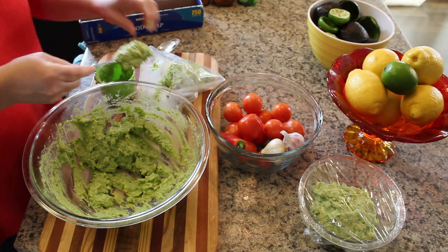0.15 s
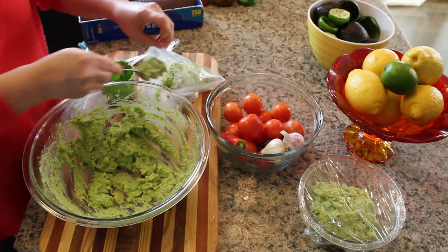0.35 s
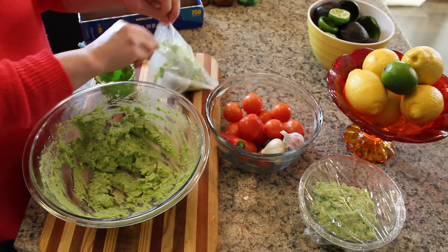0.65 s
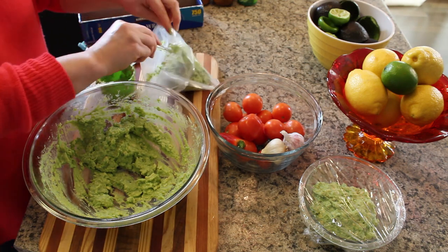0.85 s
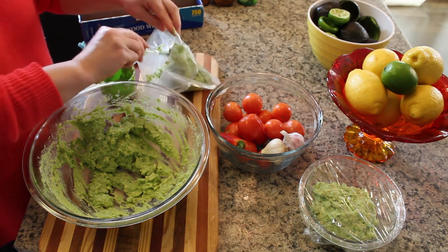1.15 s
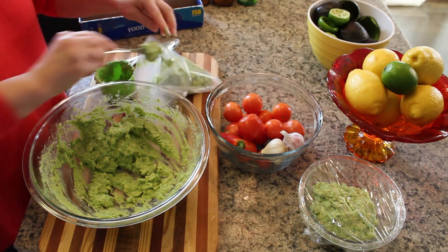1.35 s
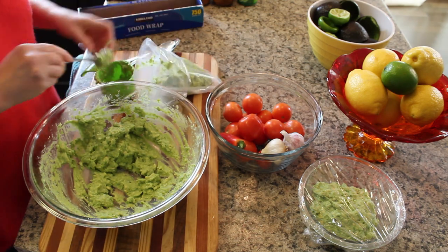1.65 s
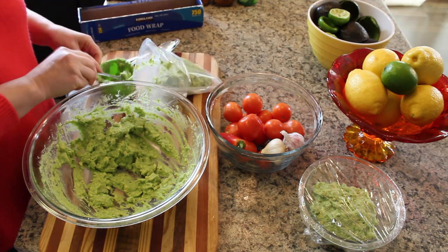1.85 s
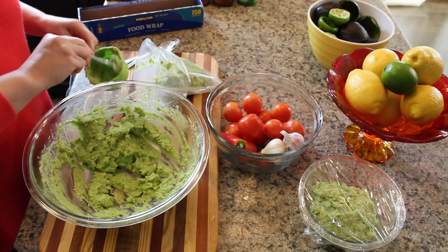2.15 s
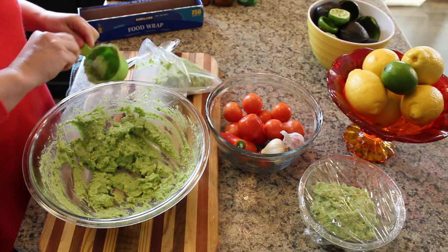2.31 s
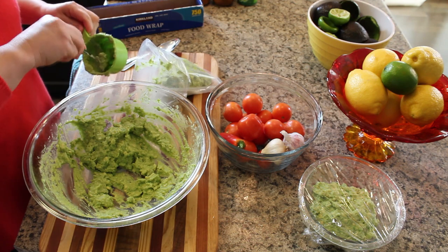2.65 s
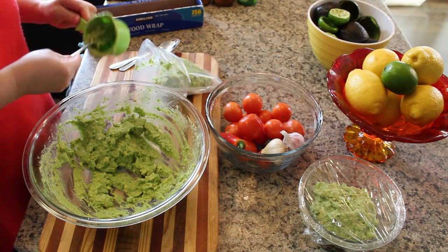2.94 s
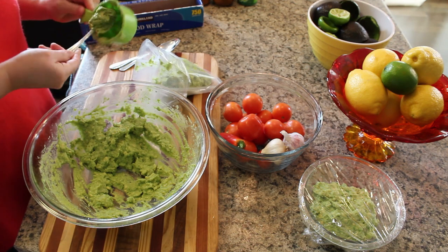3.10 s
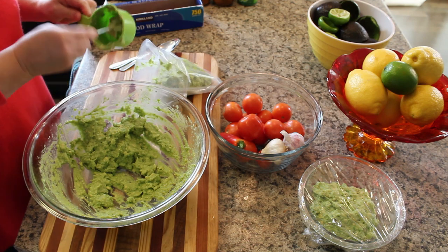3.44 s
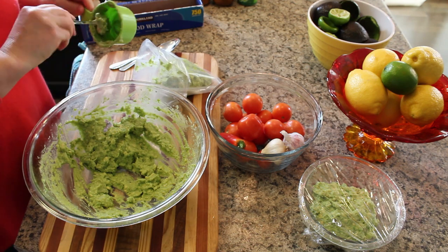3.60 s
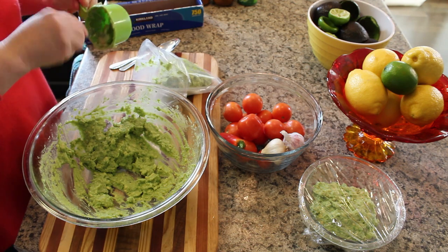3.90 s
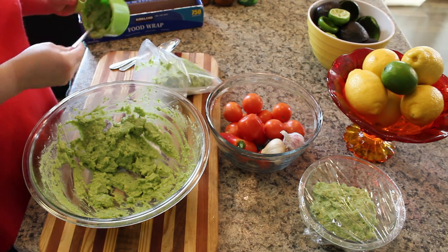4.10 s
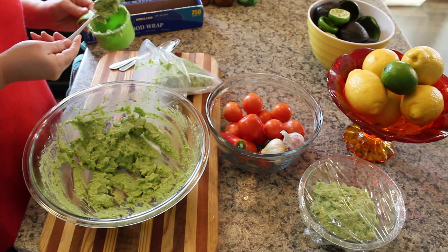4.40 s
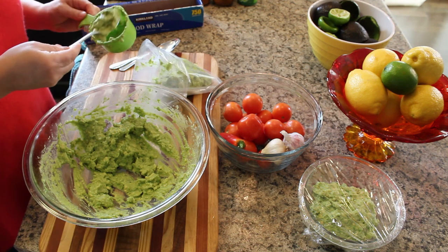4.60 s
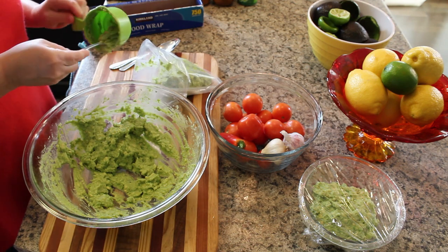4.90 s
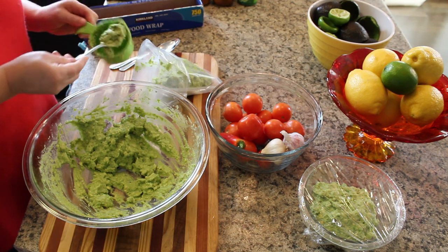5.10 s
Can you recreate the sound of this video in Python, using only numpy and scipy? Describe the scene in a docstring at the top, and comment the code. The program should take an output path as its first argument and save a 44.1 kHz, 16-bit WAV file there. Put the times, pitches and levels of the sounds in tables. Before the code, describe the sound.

A thin plastic bag crackles and snaps, then a metal spoon knocks and scrapes inside a small plastic cup in a kitchen.

```python
"""First a thin plastic bag crackles as it is filled: random creases and snaps excite damped resonances.
Then a metal spoon knocks and scrapes inside a small plastic cup held over a kitchen counter.
Knocks sum a puff of air, wall modes, a tick and a thud; scrapes send random slips through resonators.
An appliance hums faintly in steady filtered noise, and the hard kitchen rings briefly."""
import sys
import numpy as np
from scipy import signal
from scipy.io import wavfile

SR = 44100
rng = np.random.default_rng(int(sys.argv[2]) if len(sys.argv) > 2 else 0)


def to_wav(s):
    """Save 16-bit WAV."""
    ch = np.atleast_2d(s).T  # columns
    pcm = np.round(np.clip(ch, -1, 1) * 32767)  # PCM
    wavfile.write(sys.argv[1], SR, pcm.astype(np.int16))


N = 231722


def gain_of(db):
    """Level law: 20 dB is a factor of ten in amplitude."""
    return 10 ** (np.asarray(db) / 20)


def evened(x):
    """Normalization to unit rms."""
    return x / np.sqrt(np.mean(x ** 2) + 1e-20)


def peaked(x):
    """Normalization to unit peak."""
    return x / (abs(x).max() + 1e-20)


def read(points, hz):
    """Interpolation of a spectral curve along logarithmic frequency."""
    f, value = np.transpose(points)
    return np.interp(np.log(hz + 1), np.log(f + 1), value)


def add(mix, start_s, sound):
    """Superposition of a sound on the mix, cut at its end."""
    part = mix[round(start_s * SR):][:len(sound)]
    part += sound[:len(part)]


def resonate(x, hz, width):
    """Damped resonance of peak gain 1; a moving one is heterodyned to zero, smoothed and shifted back."""
    r = np.exp(-np.pi * abs(width) / SR)
    if np.ndim(hz) == 0:
        return 2 * signal.lfilter([1 - r], [1, -r * np.exp(2j * np.pi * hz / SR)], x).real
    turn = np.exp(2j * np.pi * np.cumsum(hz) / SR)
    smoothed = signal.lfilter([1 - r], [1, -r], x / turn)
    return 2 * (turn * smoothed).real


def resonate_twice(x, hz, first_width, second_width):
    """Cascaded resonances: two in series have steeper skirts than one."""
    return resonate(resonate(x, hz, first_width), hz, second_width)


def colour(x, points):
    """Minimum-phase filtering: a causal response with the given dB spectrum."""
    log_gain = np.log(gain_of(read(points, abs(np.fft.fftfreq(4096, 1 / SR)))))
    spectrum = np.exp(np.conj(signal.hilbert(log_gain)))
    taps = np.fft.ifft(spectrum).real[:2048]
    return signal.oaconvolve(x, taps)[:len(x)]


def tilted(x, treble_db):
    """Band splitting: the part above 6 kHz is lifted or lowered."""
    low_sos = signal.butter(3, 6000, "low", fs=SR, output="sos")
    high_sos = signal.butter(3, 6000, "high", fs=SR, output="sos")
    return signal.sosfilt(low_sos, x) + gain_of(treble_db) * signal.sosfilt(high_sos, x)


def grit(length, per_s, spread_db):
    """Stick-slip as random impulses: slips of random sign, a few of them large."""
    size = gain_of(spread_db * np.minimum(rng.exponential(1, length), 5))
    sign = rng.choice([-1., 1.], length)
    return evened(size * sign * (rng.random(length) < per_s / SR))


def wander(length, per_s):
    """Slow random modulation: normal values, per_s of them a second, joined by straight lines."""
    s = np.arange(int(length / SR * per_s) + 2) / per_s
    return np.interp(np.arange(length) / SR, s, rng.standard_normal(len(s)))


def decay(t60, t):
    """Exponential decay: 60 dB in t60 seconds."""
    return gain_of(-60 * t / t60)


def ring(hz, t60, t):
    """Free vibration of one mode: a decaying sine."""
    return np.sin(2 * np.pi * hz * t) * decay(t60, t)


# spectrum shape of the steady room noise: (frequency [Hz], density [dB per Hz])
ROOM_SPECTRUM = [(20, -23.5), (85, -18), (140, -11.5), (350, -14), (640, -16), (4400, -26), (9400, -35),
                 (13000, -43), (16000, -48)]
# motor lines: (frequency [Hz], rms level [dB], width [Hz], share of wavering [0-1])
MOTOR_LINES = [(111.3, -63, 10.6, 0.23), (181.3, -63.5, 22, 0.97), (260, -55, 14, 0.42), (486, -62, 24, 1)]
ROOM_NOISE_DB = -53.5  # rms


def room_tone():
    """Stationary noise and narrow-band hum: hiss and rumble with the wavering lines of a motor."""
    out = gain_of(ROOM_NOISE_DB) * evened(colour(rng.standard_normal(N), ROOM_SPECTRUM))
    t = np.arange(N) / SR
    for hz, db, width, share in MOTOR_LINES:
        waver = evened(resonate_twice(rng.standard_normal(N), hz, width, width))
        line = (1 - share) * np.sin(2 * np.pi * hz * t) + share * waver
        out = out + gain_of(db) * evened(line)
    return out


# reverberation of the kitchen: (frequency [Hz], t60 [s])
KITCHEN_T60 = [(200, 0.31), (1000, 0.37), (4000, 0.12), (12000, 0.53)]
# reflections from counter and cabinets: (delay [s], level [dB])
EARLY_ECHOES = [(.0035, -26.5), (.009, -13.5), (0.0139, -19), (0.022, -17.5)]


def kitchen(x):
    """Room impulse response: early echoes, then sparse taps, each band dying at its own speed."""
    taps = np.zeros(SR // 2)
    at = np.arange(300, len(taps) - 20, 20)
    taps[at + rng.integers(0, 20, len(at))] = rng.choice([-1., 1.], len(at))
    hz, t, bands = signal.stft(taps, SR, nperseg=256)
    decaying = bands * decay(read(KITCHEN_T60, hz)[:, None], t)
    tail = signal.istft(decaying, SR, nperseg=256)[1]
    tail = gain_of(-20.5) * tail / np.linalg.norm(tail)
    for delay_s, db in EARLY_ECHOES:
        tail[round(delay_s * SR)] += gain_of(db)
    return signal.fftconvolve(x, tail)[:N]


# radiation of small objects, little bass and a dull top: (frequency [Hz], gain [dB])
RADIATION = [(40, -47), (120, -12.5), (220, -3), (500, 1), (10500, -1.5), (13000, -5.5), (16000, -16)]


def radiated(x):
    """Radiation efficiency: objects small beside the wavelength send out little bass."""
    return colour(x, RADIATION)


# bag handling: (time [s], rustle level [dB], brightness, also fizz re rustle [dB])
BAG_HANDLING = [(0.25, -68, 0), (0.33, -51, -2), (0.45, -52, -4), (0.582, -41.5, -4), (0.65, -39.5, -13),
                (0.7, -45, -13), (0.77, -36.5, -11), (0.85, -42, -7), (0.926, -50.5, -9), (0.978, -42, -15),
                (1.02, -45, -14), (1.09, -57.5, -10), (1.17, -42, -2.5), (1.248, -50, -10),
                (1.29, -40, -11.5), (1.416, -48, -6), (1.472, -60.5, -10), (1.55, -70, 5)]
# bright edge of film fizz and of clicks: (frequency [Hz], gain [dB])
BRIGHT_EDGE = [(2500, -19), (5000, 9), (9500, 5), (12500, -3), (16500, -23.5)]
POP_HZ, POP_OCTAVES_PER_DB = 2600, 0.05  # brighter handling pops higher
FLAP_DB, FLAP_FOLLOWS = -25.5, 0.54  # flaps follow the rustle level only in part


def controls(rows):
    """Piecewise-linear control curves from the first row to the last, faded at both ends."""
    s, *columns = np.transpose(rows)
    t = np.arange(s[0], s[-1], 1 / SR)
    fade = np.clip(np.minimum(t - s[0], s[-1] - t) / 0.019, 0, 1)
    return s[0], fade, [np.interp(t, s, c) for c in columns]


def rustle():
    """Crackling noise: creases of thin film pop at random, as mid pops, fine fizz and low flaps."""
    start, fade, (pop_db, bright_db) = controls(BAG_HANDLING)
    length = len(fade)
    pop_hz = POP_HZ * 2 ** (POP_OCTAVES_PER_DB * bright_db)
    pops = resonate_twice(grit(length, 4000, 1.6), pop_hz, 2250, 2700)
    pops = pops * gain_of(2.1 * wander(length, 45.4))  # creases come in clumps
    fizz = colour(grit(length, 4000, 3.2), BRIGHT_EDGE)
    flaps = resonate_twice(grit(length, 700, 2.9), 450, 850, 850)
    layers = gain_of(pop_db) * evened(pops)
    layers = layers + gain_of(pop_db + bright_db) * evened(fizz)
    layers = layers + gain_of(FLAP_DB + FLAP_FOLLOWS * pop_db) * evened(flaps)
    return start, fade * layers


CREASES = 26  # number of small snaps
CREASE_DB, CREASE_SPREAD_DB = 16.5, 4.5  # height above the rustle level, and spread either way


def creases():
    """Random point process: rows for small snaps, as loud as the handling makes them."""
    s, db, _ = np.transpose(BAG_HANDLING)
    when, size, pitch, edge, flap = rng.random((CREASES, 5)).T
    at = s[0] + when * (s[-1] - s[0])
    level_db = np.interp(at, s, db) + CREASE_DB + CREASE_SPREAD_DB * (2 * size - 1)
    flap_db = np.full(CREASES, -12.0)
    return list(zip(at, level_db, 2300 + 2000 * pitch, 3 - 30 * edge, flap_db, 450 + 900 * flap))


# bag snaps: (time [s], level [dB], centre [Hz], bright edge re level [dB],
#             low flap re level [dB], flap frequency [Hz])
BAG_SNAPS = [(0.0391, -33, 2600, 0, -12, 1100), (0.2054, -37, 3520, -26, 0, 1270),
             (0.3012, -28, 4020, -1, -30, 886), (0.3332, -33, 2370, 4.5, -10, 762),
             (0.3624, -35.5, 3880, -17, 2, 450), (0.425, -25, 2880, -25, -7.5, 500),
             (0.4424, -27, 2990, -0.5, -8.5, 1150), (0.4963, -29, 2540, 2, -7, 681),
             (0.5257, -19, 3770, -15, -14.5, 1370), (0.5776, -11, 3200, 0.5, -24, 1370),
             (0.6294, -10, 2750, -39, -18, 1510), (0.6536, -19, 2780, -37, -26, 1380),
             (0.7566, -11, 5530, -6, -12.5, 1370), (0.9283, -28.5, 3540, -25, -16, 673),
             (0.9763, -25.5, 2199, -20, -15, 1160), (1.0983, -31.5, 2570, -3, -0.5, 681),
             (1.1418, -27, 2708, -2, 5, 820), (1.1578, -15, 3220, -20, -33, 754),
             (1.2435, -24, 3100, -34, -3.5, 666), (1.2893, -12, 2860, -32, -11.5, 1320),
             (1.311, -20, 2372, -22, -13, 1360), (1.3739, -28, 2560, 2, 3, 400),
             (1.5419, -35.5, 4140, -1, -15, 450), (1.6337, -38, 5300, 2, -9, 516),
             (1.6743, -38, 5540, 3.5, -15, 517), (1.7619, -37.5, 4110, 3, -21, 522)]
# small ticks of the spoon edge: (time [s], level [dB], centre [Hz], bright edge re level [dB])
SPOON_TICKS = [(1.9753, -16, 3450, -0.5), (2.4267, -28, 3460, 4), (2.7664, -20.5, 3500, -8),
               (2.808, -28, 3140, -20), (2.8742, -28, 3140, -3), (2.9162, -28.5, 2950, -3),
               (2.9869, -22, 3990, -8), (3.0943, -24, 4560, -25), (3.2557, -28, 3640, -25),
               (3.676, -29, 4430, -22), (3.7461, -6.5, 4860, -17), (5.129, -26, 4040, -31)]


def snap(db, hz, edge_db, flap_db=-80, flap_hz=500):
    """Impulsively excited resonance: a click of a few cycles, a bright crumpling edge, a low flap."""
    t = np.arange(round(.12 * SR)) / SR
    burst = rng.standard_normal(len(t)) * (decay(.003, t) + gain_of(-22) * decay(.1, t))
    click = peaked(resonate_twice(burst, hz, .8 * hz, .8 * hz))
    click = click + gain_of(edge_db) * peaked(colour(burst, BRIGHT_EDGE))
    shake = rng.standard_normal(len(t)) * decay(0.13, t)
    flap = peaked(resonate_twice(shake, flap_hz, 700, 700))
    return gain_of(db) * (click + gain_of(flap_db) * flap)


# modes of the cup walls: (frequency [Hz], level [dB], t60 after a knock [s])
CUP_MODES = [(660, -34, 0.071), (885.4, 2.5, 0.11), (1064, -8, 0.027), (1134, -9, 0.091),
             (1170.4, -4, 0.24), (1322, -11.5, 0.22), (1330, -23.5, 0.22), (1490, -7, 0.17), (1609, 7, .07),
             (1840, 3, 0.14), (2150, -24, .07), (2235, 13, 0.018), (2950, -10.5, .07), (3070, -71.5, 0.086)]
# spectrum shape of the rasp noise: (frequency [Hz], density [dB per Hz])
RASP_SPECTRUM = [(1200, -11), (2000, -2.5), (3700, 2), (5100, 1), (6600, -6.5), (10500, -8), (13000, -27.5),
                 (16000, -70.5)]
# rings of spoon and rim: (frequency [Hz], width [Hz], level [dB])
SPOON_RINGS = [(2420, 36, -4.5), (2750, 87, 5), (3054, 50, 12), (3670, 68, -18), (4350, 69, 4),
               (4800, 130, 0.5), (5350, 110, 2), (5900, 150, -7), (7230, 220, 1)]
# strokes along the wall: (peak time [s], rise per 20 dB [s], fall per 20 dB [s], ring of the cup [dB],
#   air pitch [Hz], rasp [dB], rasp pitch [Hz], rasp treble [dB], dull rub [dB])
WALL_STROKES = [(1.975, .06, .07, -28, 1220, -36, 3060, 2, -30),
                (2.025, 0.14, .11, -28, 1270, -28.5, 2730, -1, -52),
                (2.25, .03, .13, -27, 1104, -25, 3300, -3, -40),
                (2.7, .06, .07, -38, 1000, -44, 3500, -6, -46),
                (2.597, .05, .085, -27.5, 1100, -24, 3800, 5, -60),
                (2.784, .11, 0.08, -28, 1087, -42, 3450, 2, -40),
                (2.9, .14, .14, -50, 1140, -47, 3650, 9.5, -60),
                (3.0, .06, .085, -30, 1090, -46, 3600, 3, -46.5),
                (3.1, .03, .07, -55, 1150, -45, 4330, -5, -68),
                (3.352, .05, .075, -16, 1180, -33, 3700, -8, -60),
                (3.375, .035, .09, -30, 1080, -27.5, 3500, 0, -35),
                (3.545, .085, .09, -26, 1100, -27.5, 3720, -1, -50),
                (3.585, .04, .06, -40, 1100, -45, 3220, -2, -38),
                (3.865, .12, .12, -23, 1060, -37, 3830, 3, -45),
                (3.991, 0.12, .12, -27, 1040, -35.5, 3850, 5, -44.5),
                (4.07, .1, .165, -20, 1070, -36, 2950, -3, -44),
                (4.22, .04, 0.09, -44, 1000, -52, 3800, 11, -46),
                (4.3, 0.2, .07, -54, 1110, -50, 4300, 12.5, -59.5),
                (4.94, .03, 0.08, -31, 1150, -56, 2700, -12, -66.5),
                (5.003, .012, .07, -22, 1030, -34, 3550, 0, -55),
                (5.015, .015, .03, -24, 1050, -26.5, 3580, -5, -55),
                (5.1, .06, .17, -43, 1000, -41, 3300, 4, -52)]
PEAK_SHAPE, RASP_SHAPE = 1.05, .8  # how pointed a stroke and its rasp are
RASP_STEEPER = 1.3  # the rasp follows pressure more strongly
DULLS = .35  # treble lost per dB of pressure [dB]
ROUND = .08  # share of rise and fall over which the rasp's peak is rounded
BEFORE, AFTER = 16000, 24000  # samples of chance drawn around each peak


def stroke(peak_s, rise_s, fall_s, ring_db, air_hz, rasp_db, rasp_hz, bright_db, rub_db):
    """Stick-slip excitation: slips drive the walls through the air of the cup; finer slips rasp."""
    length, t = BEFORE + AFTER, np.arange(-BEFORE, AFTER) / SR
    on = (t > -2 * rise_s) & (t < 2 * fall_s)
    t = t[on]
    away = abs(t) / np.where(t < 0, rise_s, fall_s)  # 1 is one rise or fall time from the peak
    press_db = -20 * away ** PEAK_SHAPE
    fade = np.minimum(2 * (2 - away), 1)

    slips = resonate_twice(grit(length, 1300, 2.2)[on], air_hz, 260, 260)
    # this width makes a wall ring about half as long as after a knock
    walls = sum(gain_of(d) * resonate(slips, f, 4 / t60) * np.sqrt(t60) for f, d, t60 in CUP_MODES)
    body = evened(walls) + gain_of(-16.0) * evened(slips)

    fine = grit(length, 6000, 2.5)
    fine = (fine * gain_of(2.0 * wander(length, 118.8)))[on]  # the edge sticks and lets go
    # the moving contact wakes each ring only for a moment and detunes it
    rings = 0
    for f, width, d in SPOON_RINGS:
        wake = gain_of(d + 6.5 * wander(length, 23)[on])
        moving_hz = f * (1 + 0.02 * wander(length, 9)[on])
        rings = rings + wake * evened(resonate(fine, moving_hz, width))
    contact = resonate_twice(fine, rasp_hz, 1000, 1090)  # the patch of wall under the spoon
    tones = gain_of(-3.5) * evened(rings) + gain_of(-6) * evened(contact)
    rasp = tilted(evened(colour(fine, RASP_SPECTRUM)) + tones, bright_db + DULLS * press_db)
    rounded = np.hypot(away, ROUND) ** RASP_SHAPE - ROUND ** RASP_SHAPE
    rasp = gain_of(rasp_db - 20 * RASP_STEEPER * rounded) * rasp

    rub = resonate(resonate(grit(length, 500, 3.1)[on], 533, 380), 537, 380)
    layers = gain_of(ring_db) * evened(body) + gain_of(rub_db) * evened(rub)
    return peak_s + t[0], fade * (gain_of(press_db) * layers + rasp)


SKID_S, SKID_FALL_S = 0.021, .07  # delay of the peak after the blow; fall per 20 dB
SKID_RASP_DB, SKID_RUB_DB = -13, -6  # rasp re tick and skid; rub re thud and skid
SKID_HZ, SKID_TREBLE_DB = 2700, -12  # rasp pitch and treble


def skid(s, db, air_hz, walls_db, tick_db, bright_db, thud_db, thud_hz, skid_db):
    """Sliding friction after impact: the short stroke that follows a blow."""
    ring_db = db + skid_db
    rasp_db = ring_db + tick_db + SKID_RASP_DB
    rub_db = ring_db + thud_db + SKID_RUB_DB
    return stroke(s + SKID_S, SKID_S / 2, SKID_FALL_S, ring_db, air_hz, rasp_db,
                  SKID_HZ, SKID_TREBLE_DB, rub_db)


# spectrum of the metal tick: (frequency [Hz], gain [dB])
TICK_SPECTRUM = [(600, -12.5), (2000, -15.5), (4500, -13), (9000, -18), (12000, -23), (16500, -52)]
# spoon blows on the cup: (time [s], level [dB], air pitch [Hz], ring of the walls re level [dB],
#   tick re level [dB], tick treble [dB], thud re level [dB], thud pitch [Hz], skid re level [dB])
SPOON_KNOCKS = [(1.849, -32.5, 1060, -2, 19.5, -2, -2.5, 428, -15),
                (1.884, -4, 1263, -5.5, 4.5, -2.5, -8, 480, -16),
                (2.198, -5, 1210, 3.5, 3.5, -4, -20, 603, -17),
                (2.472, -5, 1078, 4.5, 2.5, -1, -14.5, 250, -17),
                (3.263, 3, 1222, -9, -12, -11, -44, 600, -23),
                (3.707, 1, 1140, -3, -8.5, -6, -32, 596, -19),
                (4.039, -13.5, 1100, 1, -9, -1, -34, 500, -15),
                (4.18, -16, 1092, -16, 5.5, -10, -30, 500, -18),
                (4.776, -29, 1177, 2, -4.5, -16, -18, 509, -19),
                (4.884, -2, 1130, -7.5, -5, -26, -39, 600, -15),
                (5.033, -13.5, 873, -1.5, 3, -12, -2, 564, -15)]
BOUNCE_DB = -6  # re the first contact


def knock(db, air_hz, walls_db, tick_db, bright_db, thud_db, thud_hz):
    """Modal impact: a puff of air in the cup, ringing walls, a bounce, a metal tick, a thud into the hand."""
    t = np.arange(round(.25 * SR)) / SR
    spot_db = 2.0 * rng.standard_normal(len(CUP_MODES))  # each blow lands on another spot
    # all modes start in step, drift apart and meet again
    walls = 0
    for (f, d, t60), spot in zip(CUP_MODES, spot_db):
        near_db = -16 * abs(np.log2(f / air_hz))  # the air favours walls near its pitch
        walls = walls + gain_of(d + near_db + spot) * ring(f, t60, t)
    puff_shape = np.sin(np.pi * np.clip(t / 0.0037, 0, 1) ** 0.9) ** 2
    puff = np.sin(2 * np.pi * 1.071 * air_hz * t) * puff_shape  # sounds 7 % above the air pitch
    body = puff + gain_of(walls_db) * peaked(walls) * (1 - np.exp(-t / 0.0028))

    since = np.maximum(t - .0075, 0)  # the spoon bounces once, more softly
    bounce = ring(air_hz, 0.035, since) * (1 - np.exp(-since / 0.0022))
    body = peaked(body) + gain_of(BOUNCE_DB) * peaked(bounce)

    clatter = rng.standard_normal(len(t)) * decay(0.15, t)  # the many small modes of the rim
    body = body + gain_of(-20.0) * peaked(resonate_twice(clatter, 2380, 902, 900))

    crack = rng.standard_normal(len(t)) * (decay(0.0073, t) + gain_of(-19.5) * decay(0.19, t))
    tick = gain_of(tick_db) * peaked(tilted(colour(crack, TICK_SPECTRUM), bright_db))

    shake = rng.standard_normal(len(t)) * decay(0.15, t)
    thud = 1.42 * ring(thud_hz, 0.023, t) + gain_of(-4) * ring(0.51 * thud_hz, 0.018, t)
    thud = thud + peaked(resonate_twice(shake, thud_hz, 600, 600))
    return gain_of(db) * (body + tick + gain_of(thud_db) * thud)


def scene():
    """Superposition: the near sounds radiate and excite the kitchen, above the room tone."""
    near = np.zeros(N)
    add(near, *rustle())
    for s, *row in SPOON_TICKS + BAG_SNAPS + creases():
        add(near, s + .001, snap(*row))  # starts 1 ms after the listed time
    for row in WALL_STROKES:
        add(near, *stroke(*row))
    for s, *row in SPOON_KNOCKS:
        add(near, s, knock(*row[:-1]))  # the last column belongs to the skid
        add(near, *skid(s, *row))
    near = radiated(near)
    return (near + kitchen(near) + room_tone())[None]


def record(dry):
    """Saturation and band limiting: peaks beyond full scale clip, then a low-pass at 16.3 kHz."""
    lowpass = signal.firwin(511, 16300, window=("kaiser", 9), fs=SR)[None]
    return signal.oaconvolve(np.clip(dry, -1, 1), lowpass, "same")


dry = scene()
out = record(dry)
to_wav(out)
```